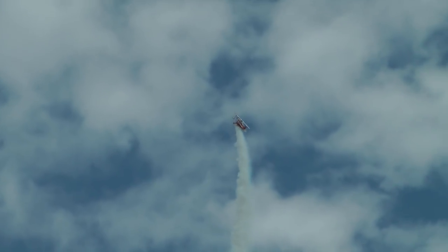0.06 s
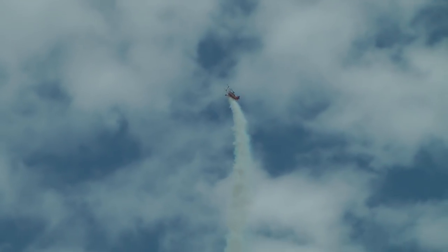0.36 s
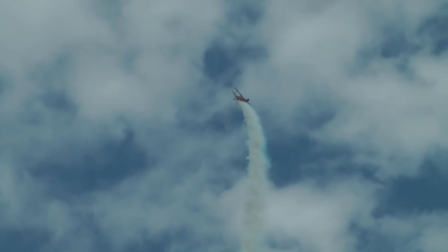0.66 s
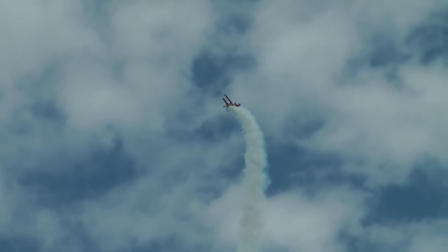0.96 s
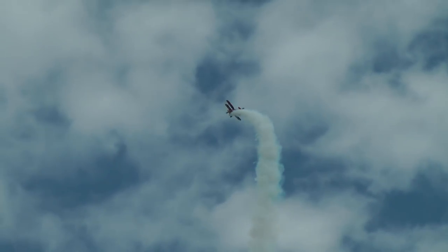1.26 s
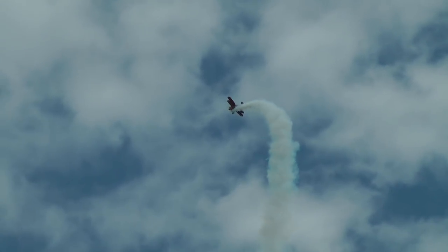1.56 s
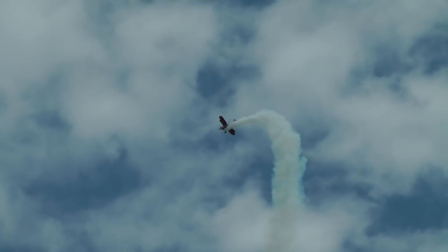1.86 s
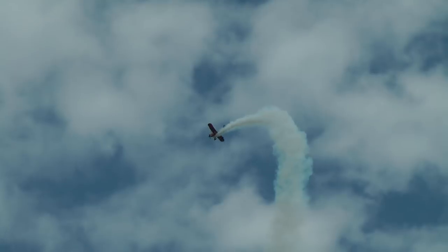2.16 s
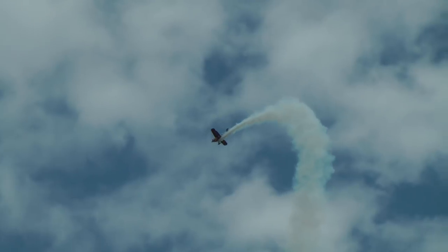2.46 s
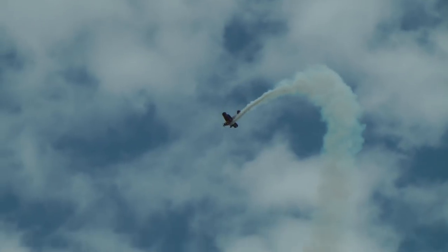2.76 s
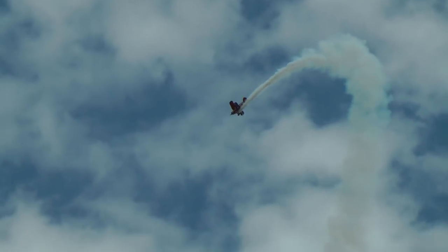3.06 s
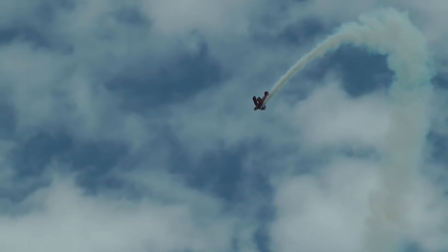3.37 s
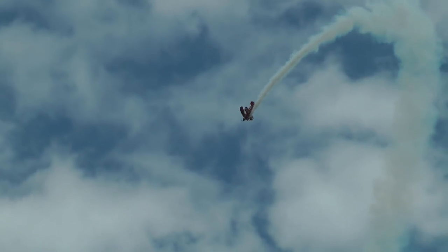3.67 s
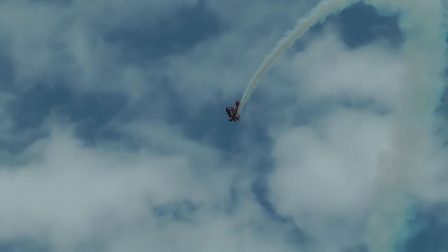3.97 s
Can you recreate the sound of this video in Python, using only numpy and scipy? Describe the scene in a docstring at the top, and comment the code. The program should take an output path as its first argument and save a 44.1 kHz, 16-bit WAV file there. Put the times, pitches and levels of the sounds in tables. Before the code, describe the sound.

A small propeller biplane roars loudly overhead, with a fast, rasping pulse and crackle on top. Its drone eases, then swells and rises slightly as it dives. A fainter second engine runs steadily, heard in the open air.

```python
"""A biplane tops a climb high above an airfield and dives; its exhaust and propeller tones
rise in pitch and swell as it comes down. Over it lies a loud, rasping roar, made of noise that
pulses about 88 times a second and crackles in the treble. A rumble and three narrower bands of
noise come and go. A second engine, probably on the ground nearby, runs at a steady speed."""
import sys
import numpy as np
from scipy import signal
from scipy.fft import rfft, irfft
from scipy.io import wavfile
from scipy.ndimage import uniform_filter1d

SR = 44100
rng = np.random.default_rng(int(sys.argv[2]) if len(sys.argv) > 2 else 0)


def log_audio(samples):
    """Write samples as a 16-bit WAV file to the path given in sys.argv[1]."""
    # one column per channel
    frames = np.atleast_2d(samples).T
    # limit to full scale, then quantise
    limited = np.clip(frames, -1, 1)
    pcm = np.round(limited * 32767).astype(np.int16)
    wavfile.write(sys.argv[1], SR, pcm)


N = 176400
T = np.arange(N) / SR
HZ = np.maximum(np.fft.rfftfreq(N, 1 / SR), 1)
PULSE_HZ, ROAR_PULSE_DEPTH, CRACK_PULSE_DEPTH = 87.8, 0.15, 0.22


def biplane():
    """One crankshaft times both the exhaust and the propeller, so their tones rise together."""
    # how often the engine fires, as heard: t/s, f/Hz
    firing_rate = [(0, 121.7), (.5, 121.9), (.85, 123.3), (1.8, 124.1), (2.4, 124.9), (2.8, 125.3),
                   (3.25, 126.3), (3.6, 126), (4, 128)]
    # loudness of the tones: t/s, firing level/dB, propeller level/dB, overtone level/dB
    tone_levels = [(0, -39, -35.5, -36), (.35, -42, -41.5, -38.5), (.85, -44.5, -48, -46),
                   (1.4, -46, -58, -47), (1.9, -45, -59, -43.5), (2.4, -43.5, -53, -50.5),
                   (2.68, -40, -35.5, -39.5), (3.0, -40, -42.5, -47.5), (3.3, -40.5, -40.5, -42),
                   (3.65, -40.5, -35.5, -36.5), (4, -36, -30, -28.5)]
    # the overtones: multiple of the crank speed, relative level/dB
    overtone_mix = [(2, -24), (6, -1.5), (7, -15.5), (8, -5.5), (9, -15), (10, -9.5), (11, -11)]
    firings_per_turn = 3
    firing_hz, = in_time(firing_rate)
    crank = phase_of(firing_hz / firings_per_turn * (1 + 0.0014 * drift(4.0)))
    firing_db, propeller_db, overtones_db = in_time(tone_levels)
    firing = from_db(firing_db) * np.sin(firings_per_turn * crank)
    propeller = from_db(propeller_db) * np.sin(4 * crank)
    overtones = tones(crank, overtone_mix, fade_db=0.95)  # moving air makes each one waver
    return np.sqrt(2) * (firing + propeller) + from_db(overtones_db) * overtones


def roar(pulse, flutter, flutter_db=0.56, rasp_from_hz=2460):
    """Noise that surges with every pulse; its rasping top swells on its own."""
    # loudness of the roar's lower part: t/s, level/dB
    body_level = [(0, -20), (.35, -21), (.6, -21.5), (1.0, -21.5), (1.5, -21.5), (1.9, -21), (2.3, -20),
                  (2.55, -20.5), (2.95, -19.5), (3.15, -21), (3.6, -19.5), (3.78, -21.5), (4, -20)]
    # loudness of its rasping top: t/s, level/dB
    rasp_level = [(0, -22), (.1, -22), (.3, -20), (.37, -19), (.44, -17.5), (.58, -20), (.68, -21.5),
                  (.8, -18.5), (1.3, -18.5), (1.4, -18), (1.6, -18.5), (1.76, -19.7), (1.95, -18),
                  (2.15, -18), (2.42, -18.3), (2.55, -20.5), (2.67, -18), (2.85, -19.5), (2.96, -16),
                  (3.08, -19.2), (3.28, -17.5), (3.45, -18), (3.69, -18), (3.76, -21), (3.86, -17.5),
                  (4, -18)]
    pulsing_noise = rng.standard_normal(N) * (1 + ROAR_PULSE_DEPTH * pulse)
    air = rms_one(coloured(pulsing_noise, roar_colour(HZ)))
    rasp = coloured(air, 1 / (1 + (rasp_from_hz / HZ) ** 24))
    both = gain_curve(body_level) * evened(air - rasp) + gain_curve(rasp_level) * evened(rasp)
    return from_db(flutter_db * flutter) * both


def roar_colour(hz):
    """How strong the roar is at each frequency: a broad shape with narrow peaks and dips."""
    # the broad shape: f/Hz, level/dB
    broad_shape = [(25, -38), (50, -39), (80, -28), (108, -24), (135, -21), (280, -19), (400, -17),
                   (560, -8.5), (780, -12), (920, -9.5), (1100, -10), (1550, -7.5), (2050, -4),
                   (2600, -4.5), (2800, 0), (3150, -2.5), (3550, -6), (3750, -11), (4200, -24.5),
                   (6500, -54.5), (10000, -68), (15000, -70)]
    # resonances (peaks) and dips: f/Hz, width/Hz, level change/dB
    resonances = [(649, 49, 3.5), (928, 22, -8), (1127, 35, 5.5), (1248, 18.5, 6.5), (1536, 12, -3.5),
                  (1780, 48, 4), (1935, 13, -2), (2105, 38, 2), (2292, 32, -9.5), (2400, 22, 3.5),
                  (2458, 27.3, -11.5), (2610, 15, -3), (2755, 25, 3), (3045, 45, 4), (3167, 22, 4.5),
                  (3350, 70, 2), (3503, 34, 7)]
    peaks_db = sum(db * np.exp(-.5 * ((hz - centre) / width) ** 2) for centre, width, db in resonances)
    return from_db(at_hz(broad_shape, hz) + peaks_db)


def crackle(pulse, flutter, flutter_db=1.8, sizzle_from_hz=5900):
    """Many tiny cracks of uneven size and pitch, strongest on each pulse; each rings briefly."""
    # loudness of the crackle: t/s, level/dB
    crackle_level = [(0, -46), (.13, -42.5), (.21, -39.5), (.34, -42), (.54, -38), (.66, -40.5), (.87, -39),
                     (1.0, -40), (1.18, -41), (1.42, -38), (1.55, -40), (1.72, -38), (1.9, -40),
                     (2.02, -39.5), (2.14, -38), (2.23, -43.5), (2.4, -39.5), (2.54, -35), (2.7, -39),
                     (2.87, -40), (2.95, -39), (3.18, -36), (3.28, -36), (3.47, -38), (3.55, -42),
                     (3.68, -38.5), (3.76, -42.5), (3.92, -39), (4, -40.5)]
    # its tone colour: f/Hz, level/dB
    crackle_colour = [(1000, -34), (3000, -3.5), (4400, 2), (5300, 2), (6600, -1), (7400, -5), (7900, -8),
                      (9300, -5.5), (10000, -14.5), (10700, -10.5), (11700, -24.5), (12600, -19.5),
                      (15000, -35)]
    # its highest part, the sizzle, compared with the rest: t/s, level/dB
    sizzle_level = [(0, -3.5), (.35, -2), (.7, -5), (1.0, -1), (2.0, 0.5), (2.3, -3.5), (2.75, -1),
                    (3.25, 3), (3.7, 4), (4, 1)]
    bands_hz, band_cracks_per_s, size_spread_db = [4430, 6600, 9650, 13100], 4000, 6
    ring_s, ring_share = 0.0037, 0.54
    cracks = 0
    for band in np.eye(len(bands_hz)):  # one band at a time
        sizes = from_db(size_spread_db * np.minimum(rng.exponential(1, N), 5))
        signs = rng.choice([-1, 1], N)
        clicks = sizes * signs * (rng.random(N) < band_cracks_per_s / SR)
        cracks = cracks + coloured(clicks, np.sqrt(np.interp(HZ, bands_hz, band)))
    ring = rng.standard_normal(N) * np.exp(-T / ring_s)
    colour = from_db(at_hz(crackle_colour, HZ)) * (1 + ring_share * rfft(ring / np.linalg.norm(ring)))
    cracks = rms_one(coloured(cracks * (1 + CRACK_PULSE_DEPTH * pulse), colour))
    sizzle = coloured(cracks, 1 / (1 + (sizzle_from_hz / HZ) ** 10))
    cracks = evened(cracks - sizzle + gain_curve(sizzle_level) * sizzle)
    return gain_curve(crackle_level) * from_db(flutter_db * flutter) * cracks


def flares(pulse):
    """Three short bursts of hiss brighten the very top of the crackle."""
    # the bursts: t/s, half length/s, level/dB
    bursts = [(2.05, .014, -51), (3.68, .018, -48), (3.83, .008, -51)]
    # their tone colour: f/Hz, level/dB
    burst_colour = [(3000, -25), (6000, -5), (9300, -3.5), (11500, -8.5), (14500, -14)]
    gain = sum(from_db(db) * np.exp(-.5 * ((T - s) / half_s) ** 2) for s, half_s, db in bursts)
    hiss = rng.standard_normal(N) * (1 + CRACK_PULSE_DEPTH * pulse)
    return gain * rms_one(coloured(hiss, from_db(at_hz(burst_colour, HZ))))


def steady_engine(cycle_hz=22.11, weak_lines_db=-29):
    """An uneven four-stroke firing cycle repeats, making many weak tones and some strong ones."""
    # the strong tones: multiple of the cycle rate, level/dB
    strong_tones = [(4, -55.5), (10, -54.5), (21, -45), (24, -38), (25, -44.5), (27, -43), (29, -39),
                    (30, -43.5), (36, -48.5), (44, -44), (66, -47.5), (68, -39.5), (80, -40), (92, -36),
                    (94, -40.5), (97, -39.5), (117, -36.5), (126, -35.5), (136, -39), (140, -39),
                    (143, -35.5)]
    cycle = phase_of(cycle_hz * (1 + 0.001192 * drift(2.0)))
    weak_hz = np.arange(1, 170) * cycle_hz
    phases = np.exp(2j * np.pi * rng.random(len(weak_hz)))
    one_cycle = rms_one(irfft(np.r_[0, roar_colour(weak_hz) * phases], 2048))
    angles = np.linspace(0, 2 * np.pi, len(one_cycle), endpoint=False)
    weak_tones = np.interp(cycle, angles, one_cycle, period=2 * np.pi)
    return from_db(weak_lines_db) * weak_tones + tones(cycle, strong_tones)


def rumble():
    """A low band of noise and a quieter, deeper one swell and sink together."""
    # loudness of the upper band: t/s, level/dB
    rumble_level = [(0, -34.5), (.35, -42.5), (.7, -37), (1.1, -42.5), (1.8, -49.5), (2.3, -45),
                    (2.67, -36.5), (3.0, -53), (3.5, -63), (4, -46)]
    low = swell(rumble_level, centre_hz=163.6, octaves=0.45)
    deep = swell(rumble_level, centre_hz=77, octaves=0.3)
    return low + from_db(-11) * deep


def middle_bands():
    """Three bands of noise at middle pitches come and go, each in its own time."""
    # a nasal band: t/s, level/dB
    nasal_level = [(0, -35.5), (.17, -24), (.33, -27), (.48, -28), (.63, -29.5), (.8, -27.5), (.95, -39),
                   (2.3, -43.5), (2.7, -37.5), (3.05, -45), (4, -37.5)]
    # a hollow band: t/s, level/dB
    hollow_level = [(0, -38), (.35, -40), (.7, -37), (1.1, -41.5), (1.8, -43), (2.2, -40), (2.45, -34.5),
                    (2.8, -39), (3.15, -43.5), (4, -47.5)]
    # a narrow, droning resonance: t/s, level/dB
    drone_level = [(0, -39), (.3, -40), (.48, -30.5), (.75, -30.5), (1.1, -34), (1.7, -37), (2.25, -30),
                   (2.6, -37), (3.0, -42.5), (3.25, -32.5), (3.55, -50), (4, -43)]
    nasal = swell(nasal_level, centre_hz=1233, octaves=0.12)
    hollow = swell(hollow_level, centre_hz=375, octaves=0.24)
    drone = swell(drone_level, centre_hz=644, octaves=0.057)
    return nasal + hollow + drone


def two_ears(sound, scatter_s=0.073):
    """Scattered echoes and small shifts in level and timing make the two ears differ a little."""
    # echoes added to one ear and taken from the other: f/Hz, relative level/dB
    echo_level = [(60, -3), (125, -21), (300, -10), (600, -18), (910, -6.5), (1200, -16), (1500, -9),
                  (2800, -25.5), (5000, -16), (10000, -28)]
    # how much louder the left ear is: f/Hz, left minus right level/dB
    left_louder = [(60, 4), (150, -3), (600, -2), (1300, 0), (3000, -0.6), (8000, -0.5)]
    # how far the wave in the left ear is ahead: f/Hz, phase/rad
    left_ahead = [(70, -0.46), (150, -0.057), (350, 0.4), (1300, 0.067), (3000, 0.17), (6000, 0.23)]
    scatter = rfft(rng.standard_normal(N) * np.exp(-T / scatter_s))
    echoes = coloured(sound, scatter / np.abs(scatter) * from_db(at_hz(echo_level, HZ)))
    ears = np.array([[1], [-1]])  # left, right
    balance = from_db(ears * at_hz(left_louder, HZ) / 2)
    timing = np.exp(.5j * ears * at_hz(left_ahead, HZ))
    return coloured(sound + ears * echoes, balance * timing)


def tones(angle, rows, fade_db=0, fade_hz=3.0):
    """Pure tones at multiples of a rotation; fade_db lets each waver in level on its own."""
    total = 0
    for multiple, db in rows:
        gain = np.sqrt(2) * from_db(db + fade_db * drift(fade_hz))
        total = total + gain * np.sin(multiple * angle + rng.uniform(0, 2 * np.pi))
    return total


def swell(level, centre_hz, octaves):
    """A band of noise that follows a level table; octaves sets its width."""
    band = 1 / (1 + (np.log2(HZ / centre_hz) / octaves) ** 2) ** 1.47
    return gain_curve(level) * evened(coloured(rng.standard_normal(N), band))


def drift(rate_hz):
    """A smooth random wobble of typical size 1; a higher rate makes it quicker."""
    step, warm_up = 100, 1000  # one point every 100 samples
    decay = np.exp(-2 * np.pi * rate_hz * step / SR)
    noise = rng.standard_normal(N // step + warm_up + 2)
    slow = signal.lfilter([1], [1, -2 * decay, decay * decay], noise)[warm_up:]
    return np.interp(np.arange(N) / step, np.arange(len(slow)), rms_one(slow))


def phase_of(hz):
    """The angle, in radians, that a rotation has turned so far."""
    return 2 * np.pi * np.cumsum(hz) / SR


def from_db(db):
    """Turn decibels into a gain, the number a signal is multiplied by."""
    return 10 ** (np.asarray(db) / 20)


def rms_one(x):
    """Scale a signal to an average power of 1."""
    return x / np.sqrt(np.mean(x ** 2) + 1e-20)


def evened(x, window_s=0.077):
    """Hold a noise near a power of 1 from moment to moment."""
    return x / np.sqrt(uniform_filter1d(x ** 2, int(window_s * SR)) + 1e-12)


def in_time(rows):
    """Join a time table's points with straight lines, one curve per value column."""
    times, *columns = np.transpose(rows)
    return [np.interp(T, times, column) for column in columns]


def gain_curve(rows):
    """Turn a table of t/s, level/dB into a gain for every sample."""
    return from_db(in_time(rows)[0])


def at_hz(rows, hz):
    """Read between the points of a frequency table, with octaves evenly spaced."""
    table_hz, values = np.transpose(rows)
    return np.interp(np.log(hz), np.log(table_hz), values)


def coloured(x, gain):
    """Filter a signal by giving each frequency its own gain."""
    return irfft(rfft(x) * gain, N)


def scene():
    """Both engines, the roar and the bands of noise, heard from nearly straight ahead."""
    pulse = np.cos(phase_of(PULSE_HZ * (1 + 0.0026 * drift(2.3))))
    flutter = drift(39)  # a quick flicker in level, shared by roar and crackle
    bands = rumble() + middle_bands()
    engines = biplane() + steady_engine()
    roaring = roar(pulse, flutter) + crackle(pulse, flutter) + flares(pulse)
    return two_ears(engines + roaring + bands)


def record(dry, peak_limit=1.54, cutoff_hz=16300):
    """Gently round off the peaks and cut the highest treble."""
    rounded = peak_limit * np.tanh(dry / peak_limit)
    return signal.sosfilt(signal.cheby2(12, 70, cutoff_hz, fs=SR, output="sos"), rounded)


dry = scene()
out = record(dry)
log_audio(out)
```